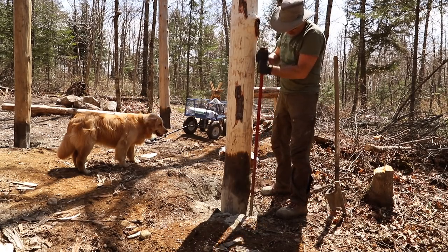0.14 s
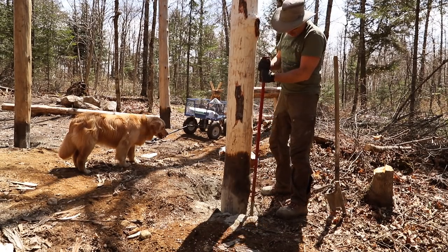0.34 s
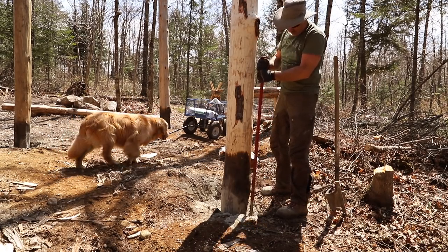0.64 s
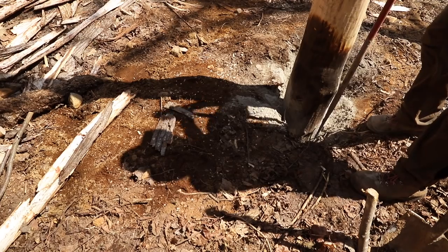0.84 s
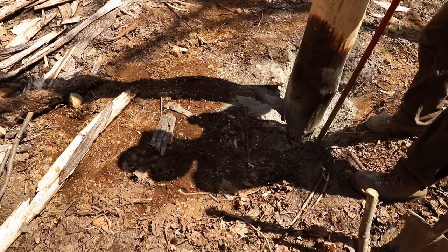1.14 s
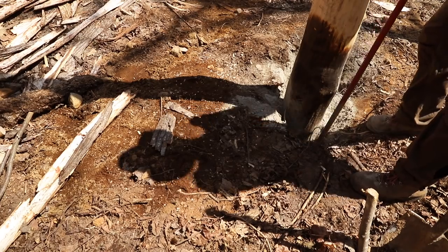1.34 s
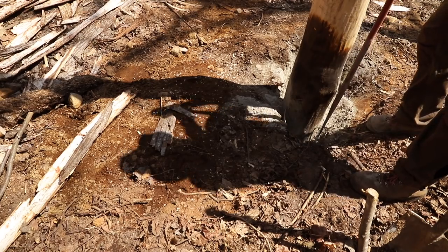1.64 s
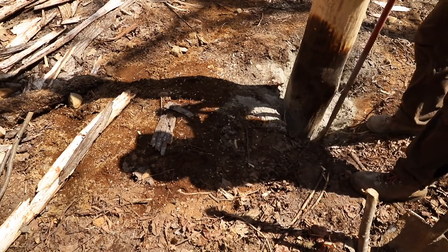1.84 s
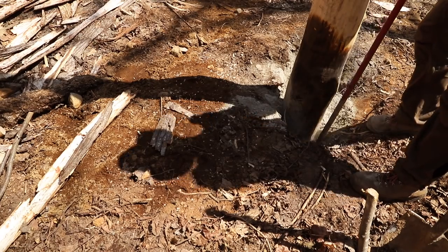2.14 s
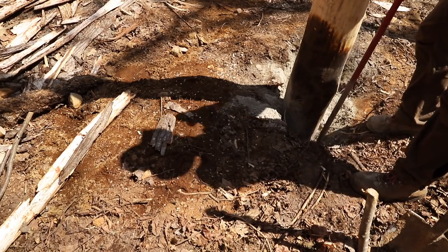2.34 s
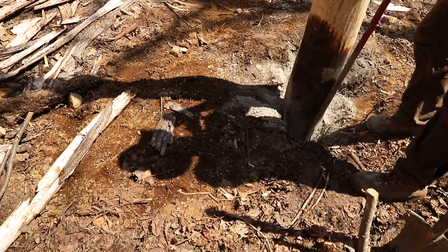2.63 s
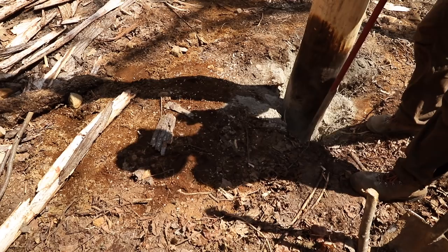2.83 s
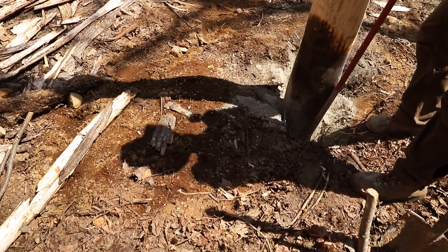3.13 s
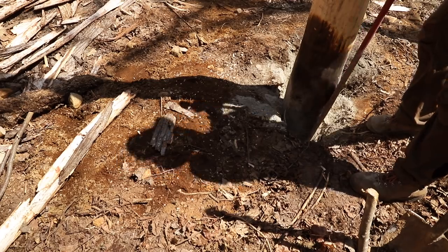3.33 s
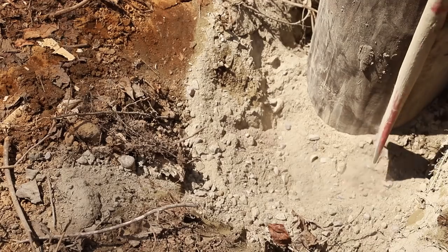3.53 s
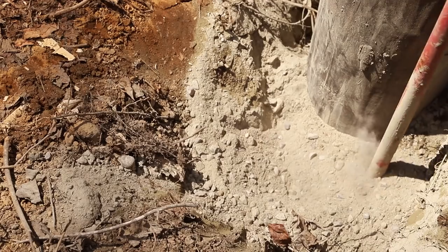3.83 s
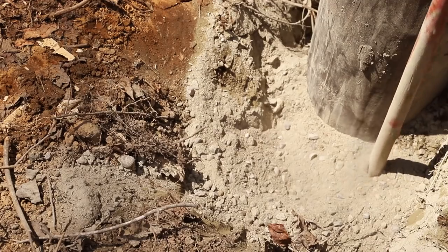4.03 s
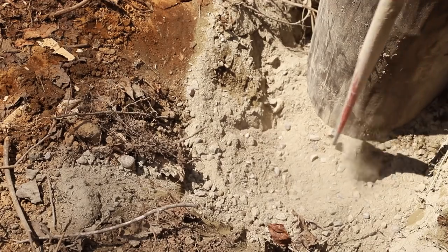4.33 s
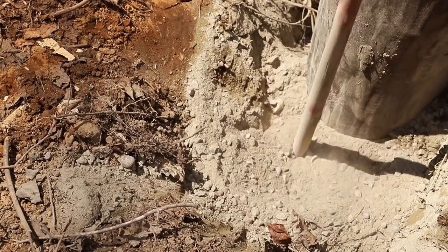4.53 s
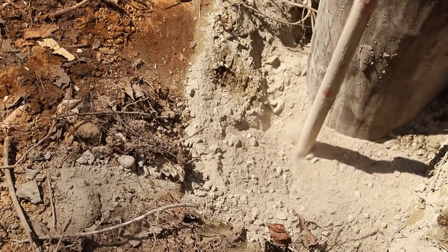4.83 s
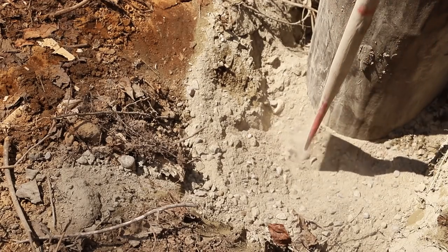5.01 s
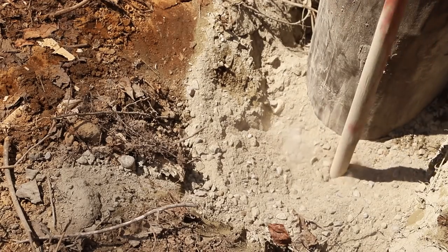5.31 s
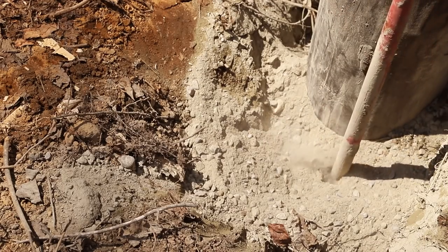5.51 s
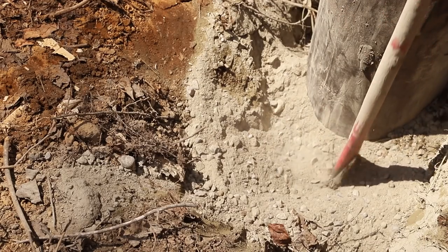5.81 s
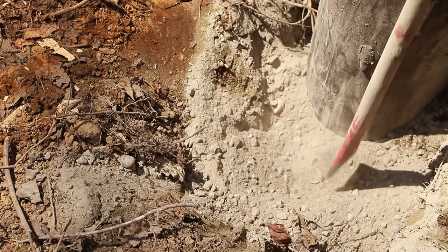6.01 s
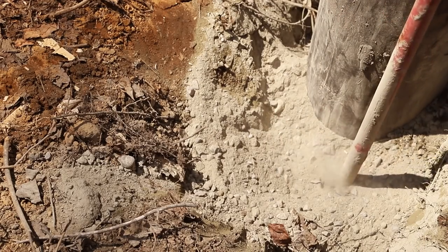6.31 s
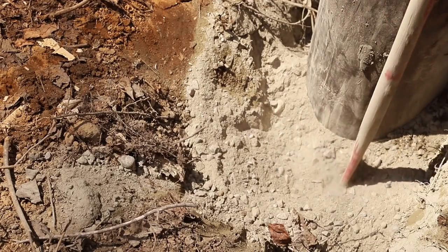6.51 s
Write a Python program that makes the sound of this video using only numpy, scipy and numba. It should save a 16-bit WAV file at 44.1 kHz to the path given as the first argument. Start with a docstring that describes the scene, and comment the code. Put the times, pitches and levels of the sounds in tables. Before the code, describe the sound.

Outdoors in a quiet wood, a steel bar is jabbed into dry gravel beside a post and drawn out again. A distant scrape under buffeting wind comes first; then closer, crunching thrusts with dull thuds, clicking pebbles and soft withdrawal scrapes. Another abrupt cut brings the bar closer still, with brighter metallic ringing, brief squeaks and grit trickling back between strokes. The last pull cuts further off. Plain, dry microphone sound.

```python
"""Steel bar worked in gravel

A long steel bar is thrust into dry gravel around a post and drawn out again, in a quiet wood.
Scraping grit rings its bending modes, modelled as damped resonators; some slips squeak on one mode.
Shaped noise makes the crunch, trickle, wind and wood; decaying tones make thuds, pebbles and free ring.
Four sections join abruptly: far and windy, nearer from 0.79 s, close from 3.43 s, further off from 6.61 s."""
import sys
import numpy as np
from scipy import signal
from scipy.fft import rfft, irfft
from scipy.io import wavfile
from scipy.ndimage import uniform_filter1d
from numba import njit

SR = 44100
rng = np.random.default_rng(int(sys.argv[2]) if len(sys.argv) > 2 else 0)


def inscribe(sig):
    """Save sig as 16-bit PCM at rate SR to the path in sys.argv[1].

    A 1-D sig is mono; a 2-D sig holds one channel per row.
    Samples are clipped to [-1, 1] before scaling.
    """
    pcm = np.round(np.clip(np.atleast_2d(sig).T, -1, 1) * 32767)
    wavfile.write(sys.argv[1], SR, pcm.astype(np.int16))


N = 293706

# Thrusts into the gravel. Each row: tip enters in s, bite (onset) in s, fastest in s, stopped in s,
# ring at entry in dB, ring at fastest in dB, crunch at entry in dB, ring treble minus ring in dB,
# ring bass in dB, soft plane raised by in dB, trickle after in dB.
THRUSTS = [(.098, .008, .11, .4, -38, -38, -32, -8, -42, 1, -75),
           (1.081, .006, 1.155, 1.268, -31, -27.5, -31.5, -16.5, -41, -1, -63),
           (1.914, .004, 1.93, 1.99, -39, -41, -39, -13, -47, 0, -75),
           (1.957, .003, 2.04, 2.135, -30.5, -32, -29.5, -17, -39, 0, -62),
           (2.786, .024, 2.845, 2.93, -30, -27.5, -31, -17, -40, -1.5, -67),
           (3.686, .025, 3.84, 3.895, -40, -29, -33, -18.5, -38, 2, -68),
           (4.528, .002, 4.59, 4.68, -31, -31, -35.5, -17, -37, 1, -76),
           (5.32, .002, 5.4, 5.478, -36, -26, -32.5, -19, -36.5, 0, -78),
           (6.138, .02, 6.23, 6.283, -37, -28, -34, -20, -34, -1, -66)]
# Pulls out of it. Each row: begins in s, full in s, eases in s, clear in s, ring when full in dB,
# crunch in dB, ring treble minus ring in dB, ring bass minus ring in dB, soft plane raised by in dB,
# trickle after in dB.
PULLS = [(.7, .788, .789, .83, -43, -52, -20, -14, -1, -62),
         (1.36, 1.495, 1.6, 1.655, -42.5, -50, -17, -8, 0, -58),
         (2.28, 2.425, 2.44, 2.53, -37.5, -47, -16, -11, -2, -62),
         (2.685, 2.7, 2.7005, 2.73, -54, -60, -21, -10, 4, -72),
         (3.15, 3.3, 3.35, 3.39, -43, -45, -20, -10, 8, -75),
         (3.33, 3.428, 3.435, 3.495, -30.5, -43, -20, -7, -1.5, -66),
         (4.0, 4.055, 4.28, 4.32, -38, -58, -19, -8, -1, -70),
         (4.82, 4.92, 5.03, 5.1, -38.5, -49, -20, -10, -2.5, -66),
         (5.6, 5.77, 5.855, 5.925, -37.5, -51, -17.5, -4.5, -1, -66),
         (6.405, 6.496, 6.6, 6.7, -42, -54, -19, -7, 3, -75),
         (6.5, 6.613, 6.66, 6.7, -52, -59, -17, -8, 3, -75)]
# Times at which the sound switches abruptly to the next section, at another distance, in s.
SWITCHES_S = [.787, 3.427, 6.612]

# Bending modes, one row per plane: a in Hz, b, c, d, first n, last n;
# frequency in Hz = a q^2 / (1 + b q^2)^c with q = n + d.
BENDING_PLANES = [(17.947, .00134974, .282104, .19154, 5, 33),
                  (15.08438, .000982465, .263346, .51395, 7, 33)]
# Relative loudness of the bending modes in each plane. Each row: frequency in Hz, level in dB.
STIFF_PLANE = [(480, -29.5), (900, -23), (1500, -20.5), (2200, -9), (3800, -7), (5300, -14), (7000, -21.5),
               (9000, -32), (12000, -30.5), (15300, -42)]
SOFT_PLANE = [(800, -43.5), (1900, -19), (2700, -9.5), (3500, -28.5), (5500, -50), (7000, -37), (9000, -26),
              (13500, -41)]
# Lengthwise and other long-ringing modes. Each row: frequency in Hz, free T60 in s.
LONG_MODES = [(1438, 1.2), (2879, .95), (4313, .6), (9738, .35), (10015, .35)]
# Relative loudness of those modes while scraped, in dB.
LONG_SCRAPED_DB = [-26, -24, -26, -36, -37]
# Bar leaves the gravel, long modes ring on. Each row: start in s, peak in dB, lowest mode peak in dB.
FREE_RINGS = [(.788, -63, -80), (1.62, -72, -78), (2.5, -66, -76), (3.43, -47.5, -50), (4.29, -65, -65),
              (5.05, -57, -69), (5.9, -63, -54)]
# Higher long modes relative to that peak, in dB.
UPPER_RING_DB = [0, -1, -10, -11]
# Slip locks on to one mode. Each row: time of peak in s, frequency in Hz, peak in dB, fall in s per 6 dB.
SQUEAKS = [(0.21, 2158, -38, .01), (1.499, 3856, -41, .01), (1.559, 2544, -43, .01),
           (1.963, 1163, -30, .027), (3.243, 2551, -48, .052), (3.243, 2611, -47, .025),
           (3.34, 1939, -35, .016), (3.34, 2278, -36.5, .02), (3.435, 3380, -33, .025),
           (3.732, 1947, -35, .01), (4.171, 2534, -40, .012), (4.21, 1176, -38, .017),
           (4.238, 3392, -40, .015), (4.288, 2152, -41, .015), (4.976, 2945, -39, .01),
           (5.014, 3386, -41, .025), (5.365, 896, -30, .007), (5.85, 3845, -39, .025),
           (6.181, 900, -32, .01), (6.233, 2539, -29, .012), (6.493, 2150, -42, .01)]

# Spectrum of the shifting gravel. Each row: frequency in Hz, relative level in dB per Hz.
CRUNCH_SPECTRUM = [(35, -47), (60, -55), (176, 6), (822, 4), (2770, -12.5), (3340, -10.5), (3580, -7.5),
                   (3850, -21), (4530, -16.5), (12700, -45), (16000, -52)]
# Spectrum of the low body of the packed fill. Each row: frequency in Hz, relative level in dB per Hz.
BOOM_SPECTRUM = [(45, -28), (95, -6), (130, -5), (270, 0), (430, -18), (900, -60)]
# Boom relative to the crunch in each section, in dB.
BOOM_IN_SECTION_DB = [-14, -4, -14, -14]
# Tip stops or jolts in the packed fill. Each row: start in s, peak in dB, nominal pitch in Hz
# (sags from 1.26 to 0.5 times it), ground shake in dB.
THUDS = [(0.33, -46, 91.5, -58), (1.09, -40, 150, -58), (1.239, -36, 237, -58), (1.958, -23, 242, -58),
         (1.922, -36, 260, -62), (1.975, -32, 160, -60), (2.108, -33, 236, -53), (2.701, -48, 143, -55),
         (2.919, -42, 250, -52), (3.881, -36.5, 91.5, -54), (3.948, -41.5, 231, -59),
         (4.202, -36, 366, -68), (4.656, -34, 145, -47), (4.999, -45, 283, -67), (5.469, -33.5, 93, -51),
         (6.269, -36, 91.5, -46)]
# Single pebbles dropping back. Each row: start in s, peak in dB, pitch in Hz, tick minus peak in dB.
PEBBLES = [(0.906, -43, 2880, -28), (1.255, -36, 2580, -34), (1.354, -35, 2530, -22),
           (1.921, -19.5, 2700, -24), (2.19, -52, 5200, -4), (2.263, -47, 2560, -12),
           (2.308, -34, 2550, -26), (2.664, -47, 3150, -24), (2.966, -44, 2640, -27), (3.03, -55, 5500, -5),
           (3.098, -54, 5000, -5), (3.201, -32.5, 2650, -20), (4.447, -57, 1430, -1),
           (4.472, -28, 2080, -11), (4.682, -50, 2790, -23), (4.71, -40, 2860, -30),
           (4.742, -54, 2650, -23), (4.868, -33, 4400, -26), (5.12, -31, 2870, -30), (5.14, -33, 2890, -30),
           (5.178, -53, 1200, -21), (5.18, -39, 4280, -26), (5.193, -38, 1940, -26),
           (5.256, -42.5, 1960, -30), (5.632, -42, 3040, -30), (6.045, -54, 1440, -27),
           (6.364, -42, 1320, -34), (6.43, -40, 3370, -33)]
# Spectrum of the trickling grit. Each row: frequency in Hz, relative level in dB per Hz.
GRIT_SPECTRUM = [(88, -39), (150, -23.5), (249, 5), (341, 7.5), (637, 2.5), (1190, -5), (2980, -0.5),
                 (12900, -36.5), (16000, -42)]

# Wind gusts in the first section. Each row: time of peak in s, peak in dB.
GUSTS = [(.145, -43), (.21, -42), (.27, -44), (.34, -38), (.41, -43), (.53, -37), (.59, -42), (.652, -42),
         (.755, -37)]
# Rumble level. Each row: time in s, level in dB.
RUMBLE = [(.79, -80), (3.42, -74), (3.43, -79), (6.66, -67)]
# Faint far hum. Each row: time in s, frequency in Hz, level in dB.
HUM = [(.79, 101, -76), (1.6, 100, -72), (2.6, 98, -70), (2.9, 82.3, -67), (3.43, 74, -72)]
# Spectrum of the wood. Each row: frequency in Hz, relative level in dB per Hz.
WOOD_SPECTRUM = [(35, -62), (60, -9), (207, -10.5), (968, -12.5), (1620, -24), (2190, -17.5), (2410, -21),
                 (2970, -25), (6900, -35), (16000, -36)]
# Spectra of wind and rumble. Each row: frequency in Hz, relative level in dB per Hz.
WIND_SPECTRUM = [(15, -14), (50, 0), (90, -8), (160, -30), (400, -60)]
RUMBLE_SPECTRUM = [(15, -30), (25, -14), (50, -4), (70, -9), (130, -33), (300, -61)]

# Bands in which noise levels are counted
BASS_HZ, CRUNCH_BAND_HZ, TRICKLE_BAND_HZ, ALL_HZ = (20, 110), (130, 1330), (400, 4000), (100, 16000)
# Thrust: power-law fall after the fastest point, treble tick at entry
STOP_DB, STOP_POWER = -46, 3.6
CRUNCH_FADE_DB_PER_S, ENTRY_TICK_DB, ENTRY_TICK_S = 55, 14, .007
# Pull: swells from faint and back; until full the crunch follows a share of the rise
FAINT_DB, CRUNCH_SHARE, EDGE_DB_PER_S = -60, .4, 450
JOLT_DB, JOLT_S = -1, .02  # a thud in mid-pull shifts the gravel as well
UNEVEN_DB, UNEVEN_RATE_HZ = 2.6, 75
FREE_T60_AT_3KHZ_S, BURIED_LOSS, SLIDING_LOSS = .21, 4.04, 1.99  # losses relative to free air
NODE_DB, NODE_RATE_HZ, HOP_SAMPLES = 3.0, 28, 128
SQUEAK_RISE_S = .011  # first 6 dB down from the peak
THUD_T60_S, SHAKE_HZ, SHAKE_PEAK_S = .06, 52, .017
TRICKLE_FADE_DB_PER_S, TRICKLE_FLOOR_DB = 50, -78
LOOSEN_DB, LOOSEN_DB_PER_S = -22, 70  # relative to the ring of the pull
LULL_DB, GUST_RISE_DB_PER_S, GUST_FALL_DB_PER_S = -51, 300, 90
WOOD_DB, TOP_HZ = -63, 15750


def undb(db):
    """dB to amplitude."""
    return 10 ** (np.asarray(db) / 20)


def curve(rows, column=1, off=-150.):
    """One column of a table at every sample; off outside its span."""
    rows = np.array(rows)
    return np.interp(np.arange(N) / SR, rows[:, 0], rows[:, column], off, off)


def on_log(points, hz):
    """Table levels interpolated over log frequency."""
    points = np.array(points)
    return np.interp(np.log(hz), np.log(points[:, 0]), points[:, 1])


def colour(x, points, lo_hz, hi_hz):
    """Shapes x by a spectrum; rms 1 between lo_hz and hi_hz."""
    hz = np.maximum(np.arange(N // 2 + 1) * SR / N, 1)
    spectrum = rfft(x) * undb(on_log(points, hz))
    inside = (hz > lo_hz) & (hz < hi_hz)
    rms = np.sqrt(2 * np.sum(np.abs(spectrum[inside]) ** 2)) / N
    return irfft(spectrum, N) / rms


def grains(rate_hz, spread_db, smooth, most=3.2):
    """Random clicks of very unequal size over a share of smooth noise; rms 1."""
    hit = rng.random(N) < rate_hz / SR
    size = undb(spread_db * np.minimum(rng.exponential(size=N), most))
    clicks = hit * rng.standard_normal(N) * size
    x = clicks / clicks.std() + smooth * rng.standard_normal(N)
    return x / x.std()


def waver(rows, length, held):
    """Independent random steps per row, each held for some points and smoothed into ramps."""
    steps = np.repeat(rng.standard_normal((rows, length // held + 2)), held, axis=1)
    return uniform_filter1d(steps, held, axis=1)[:, :length]


def add(out, start_s, sound):
    """Mixes a sound into out from start_s."""
    i = int(start_s * SR)
    out[i:i + len(sound)] += sound[:N - i]


def same_section(s):
    """True during the section that holds time s."""
    return np.searchsorted(SWITCHES_S, np.arange(N) / SR) == np.searchsorted(SWITCHES_S, s)


def strokes():
    """Gains of ring, crunch, ring treble and ring bass; uneven gravel lets each waver."""
    t = np.arange(N) / SR
    gain = np.zeros((4, N))
    for enter, bite, fast, stop, entry_db, fast_db, crunch_db, treble_db, bass_db, *_ in THRUSTS:
        age = np.maximum(t - enter, 0)
        fall_db = STOP_DB * np.clip((t - fast) / (stop - fast), 0, 2) ** STOP_POWER
        ring_db = np.interp(t, [enter, fast], [entry_db, fast_db])
        tick_db = ENTRY_TICK_DB * np.exp(-age / ENTRY_TICK_S)
        layers_db = np.array([ring_db, crunch_db - CRUNCH_FADE_DB_PER_S * age,
                              ring_db + treble_db + tick_db, np.full(N, bass_db)])
        gain += np.minimum(age / bite, 1) * undb(layers_db + fall_db)
    for begin, full, ease, clear, full_db, crunch_db, treble_db, bass_db, *_ in PULLS:
        faint_db = FAINT_DB - full_db
        swell_db = np.interp(t, [begin, full, ease, clear], [faint_db, 0, 0, faint_db])
        ring_db = full_db + swell_db
        edge_db = -EDGE_DB_PER_S * np.maximum(np.maximum(begin - t, t - clear), 0)
        crunch_swell_db = np.where(t < full, CRUNCH_SHARE, 1) * swell_db
        layers_db = np.array([ring_db, crunch_db + crunch_swell_db, ring_db + treble_db, ring_db + bass_db])
        gain += same_section(full) * undb(layers_db + edge_db)
    for s, db, *_ in THUDS:
        if any(full < s < ease for _, full, ease, *_ in PULLS):
            gain[1] += (t > s) * undb(db + JOLT_DB) * np.exp(-np.abs(t - s) / JOLT_S)
    return gain * undb(UNEVEN_DB * waver(len(gain), N, int(SR / UNEVEN_RATE_HZ)))


def grip():
    """Damping relative to free air: high from a thrust until the pull, fading as the bar comes out."""
    points = []
    for enter, _, _, stop, *_ in THRUSTS:
        points += [(enter - .002, 1), (enter, BURIED_LOSS), (stop, BURIED_LOSS)]
    for begin, full, ease, clear, *_ in PULLS:
        here = same_section(full)
        for s, loss in [(begin, SLIDING_LOSS), (ease, SLIDING_LOSS), (clear, 1)]:
            if here[min(int(s * SR), N - 1)]:
                points.append((s, loss))
    return curve(sorted(points), off=1.)


def soft_plane_balance():
    """Level of the softer bending plane against the stiffer one, stroke by stroke (dB)."""
    return curve(sorted([(row[2], row[-2]) for row in THRUSTS + PULLS]), off=0.)


@njit
def ring(force, group, loss, hz, decay, gain, hop):
    """Bank of modes whose damping follows loss; gain moves every hop samples."""
    out = np.zeros(len(loss))
    for m in range(len(hz)):
        turn, z = np.exp(2j * np.pi * hz[m] / SR), 0j
        for i in range(len(loss)):
            z = z * turn * (1 - decay[m] * loss[i]) + gain[m, i // hop] * force[group[m], i] + 1e-18
            out[i] += z.imag
    return out


def bar(bass, middle, treble):
    """Grit drives the modes; each swells and fades as its nodes slide past the gravel surface."""
    bending_hz = []
    for a, b, c, d, first, last in BENDING_PLANES:
        q = np.arange(first, last + 1) + d
        bending_hz.append(a * q ** 2 / (1 + b * q ** 2) ** c)
    stiff_hz, soft_hz = bending_hz
    hz = np.concatenate([stiff_hz, soft_hz, np.transpose(LONG_MODES)[0]])
    db = np.concatenate([on_log(STIFF_PLANE, stiff_hz), on_log(SOFT_PLANE, soft_hz), LONG_SCRAPED_DB])
    t60_s = FREE_T60_AT_3KHZ_S * (hz / 3000) ** -.15
    decay = np.log(1000) / (t60_s * SR)
    group = np.searchsorted([2050, 6700], hz)  # bass, middle, treble
    for g in range(3):  # unit power per group
        db[group == g] -= 10 * np.log10(np.sum(undb(db[group == g]) ** 2))
    held = int(SR / HOP_SAMPLES / NODE_RATE_HZ)
    nodes_db = NODE_DB * (waver(len(hz), N // HOP_SAMPLES + 1, held) - .3)
    nodes_db[len(stiff_hz):len(stiff_hz) + len(soft_hz)] += soft_plane_balance()[::HOP_SAMPLES]
    loss = grip()
    for s in SWITCHES_S:  # the ring breaks off before each switch
        loss[int(s * SR) - 40:int(s * SR)] = 100
    # firmer contact both damps and drives harder
    grit = grains(2500, 2.2, .7) * np.sqrt(np.minimum(loss, BURIED_LOSS))
    dull = signal.sosfilt(signal.butter(4, 6500, fs=SR, output="sos"), grit)
    force = np.array([dull * bass, dull * middle, grit * treble])
    mode_gain = 2 * undb(db) * np.sqrt(decay)
    out = ring(force, group, loss, hz, decay, mode_gain[:, None] * undb(nodes_db), HOP_SAMPLES)
    # the ring carries little below about 350 Hz
    return signal.sosfilt(signal.butter(2, 350, "high", fs=SR, output="sos"), out)


def squeaks():
    """Stick-slip on one mode: each swells and fades, never before its stroke or section has begun."""
    out = np.zeros(N)
    t = np.arange(-SR // 10, SR // 5) / SR
    starts_s = SWITCHES_S + [row[0] for row in THRUSTS + PULLS]
    for s, hz, db, fall_s in SQUEAKS:
        begun = s + t > max(k for k in starts_s if k < s)
        drop_db = 6 * np.where(t < 0, (t / SQUEAK_RISE_S) ** 2, t / fall_s)
        add(out, s + t[0], begun * undb(db - drop_db) * np.sin(2 * np.pi * hz * t))
    return out


def free_ring():
    """Long modes fading in open air, stilled as the tip goes back in."""
    out = np.zeros(N)
    for s, peak_db, lowest_db in FREE_RINGS:
        next_s = min(row[0] for row in THRUSTS if row[0] > s)
        t = np.arange(int((next_s - s) * SR)) / SR
        levels_db = [lowest_db, *(peak_db + np.array(UPPER_RING_DB))]
        for (hz, t60_s), db in zip(LONG_MODES, levels_db):
            envelope = (1 - np.exp(-t / .005)) * np.exp(-np.log(1000) * t / t60_s)
            add(out, s, undb(db) * np.sin(2 * np.pi * hz * t) * envelope)
    return out


def crunch(gain):
    """The gravel itself shifting under the bar; little of it reaches the deep bass."""
    section = np.searchsorted(SWITCHES_S, np.arange(N) / SR)
    boom = undb(BOOM_IN_SECTION_DB)[section] * colour(rng.standard_normal(N), BOOM_SPECTRUM, *ALL_HZ)
    gravel = colour(grains(1800, 2.2, .8), CRUNCH_SPECTRUM, *CRUNCH_BAND_HZ)
    return signal.sosfilt(signal.butter(1, 70, "high", fs=SR, output="sos"), gain * (gravel + boom))


def thuds():
    """Packed fill struck by the tip: a decaying tone sags in pitch, the ground shakes a little later."""
    out = np.zeros(N)
    t = np.arange(int(.2 * SR)) / SR
    for s, db, hz, shake_db in THUDS:
        cycles = .5 * hz * (t + .035 * (1 - np.exp(-t / .023)))
        add(out, s, undb(db) * np.sin(2 * np.pi * cycles) * np.exp(-np.log(1000) * t / THUD_T60_S))
        swell = t / SHAKE_PEAK_S * np.exp(1 - t / SHAKE_PEAK_S)
        add(out, s, undb(shake_db) * np.sin(2 * np.pi * SHAKE_HZ * t) * swell)
    return out


def pebbles():
    """Impacts click for a cycle or two with a noisy tick, then bounce once, 7 dB softer."""
    out = np.zeros(N)
    t = np.arange(SR // 100) / SR
    for s, db, hz, tick_db in PEBBLES:
        tone = 1.5 * np.sin(2 * np.pi * hz * t) * np.exp(-1.6 * hz * t)
        tick = rng.standard_normal(len(t)) * (1.5 * np.exp(-t / .0004) + .3 * np.exp(-t / .003))
        click = tone + undb(tick_db) * tick
        add(out, s, undb(db) * click)
        add(out, s + rng.uniform(.0015, .004), undb(db - 7) * click)
    return out


def trickle():
    """Loose grit runs back into the hole after each stroke and starts to give before a pull."""
    t = np.arange(N) / SR
    gain = np.full(N, undb(TRICKLE_FLOOR_DB))
    for row in THRUSTS + PULLS:
        end, db = row[3], row[-1]
        gain += same_section(end) * (t > end) * undb(db - TRICKLE_FADE_DB_PER_S * np.abs(t - end))
    for _, full, _, clear, ring_db, *_ in PULLS:
        loosen_db = ring_db + LOOSEN_DB - LOOSEN_DB_PER_S * np.maximum(full - t, 0)
        gain += same_section(full) * (t < clear) * undb(loosen_db)
    return gain * colour(grains(500, 3.0, 1.14), GRIT_SPECTRUM, *TRICKLE_BAND_HZ)


def wind():
    """Low noise as wind buffets the microphone in the first section; gusts rise fast, die slower."""
    t = np.arange(N) / SR
    level_db = np.full(N, float(LULL_DB))
    for s, db in GUSTS:
        slope_db = np.where(t < s, GUST_RISE_DB_PER_S * (t - s), GUST_FALL_DB_PER_S * (s - t))
        level_db = np.maximum(level_db, db + slope_db)
    gain = uniform_filter1d(same_section(0) * undb(level_db), size=220)
    return gain * colour(rng.standard_normal(N), WIND_SPECTRUM, *BASS_HZ)


def rumble():
    """Faint low noise from the second section on."""
    return undb(curve(RUMBLE)) * colour(rng.standard_normal(N), RUMBLE_SPECTRUM, *BASS_HZ)


def hum():
    """Faint far sine gliding in pitch, in the second section."""
    cycles = np.cumsum(curve(HUM, off=0.)) / SR
    return undb(curve(HUM, column=2)) * np.sqrt(2) * np.sin(2 * np.pi * cycles)


def wood():
    """Steady shaped noise of the quiet wood."""
    return undb(WOOD_DB) * colour(rng.standard_normal(N), WOOD_SPECTRUM, *ALL_HZ)


def scene():
    """Sum of all sources, the same on both channels."""
    middle, gravel, treble, bass = strokes()
    steel = bar(bass, middle, treble) + squeaks() + free_ring()
    fill = crunch(gravel) + thuds() + pebbles() + trickle()
    mono = steel + fill + wind() + rumble() + hum() + wood()
    return np.array([mono, mono])


def record(dry):
    """One microphone on both channels; a steep low-pass cuts the top."""
    return signal.sosfilt(signal.ellip(10, .2, 80, TOP_HZ, fs=SR, output="sos"), dry)


dry = scene()
out = record(dry)
inscribe(out)
```